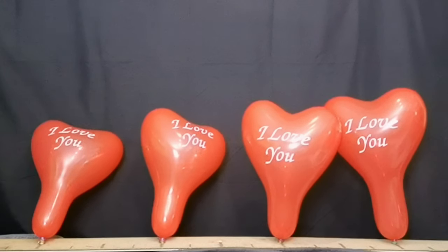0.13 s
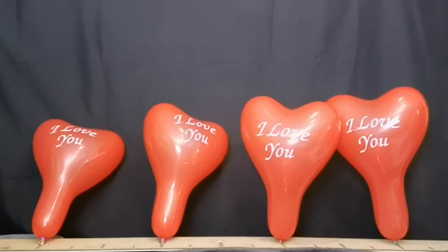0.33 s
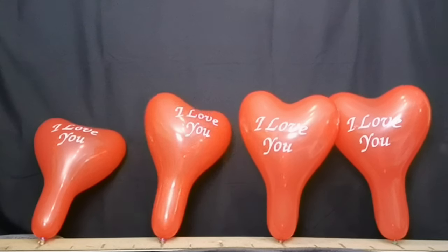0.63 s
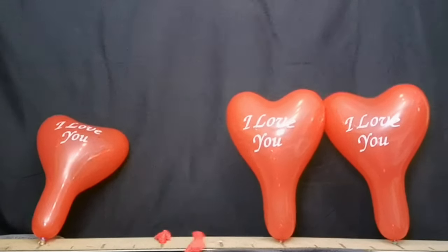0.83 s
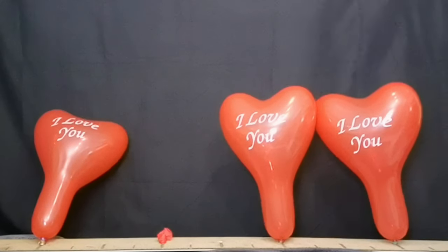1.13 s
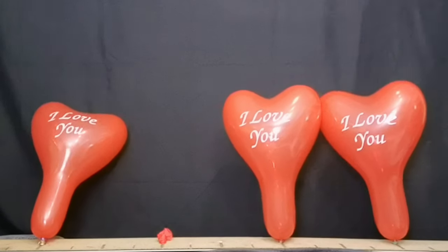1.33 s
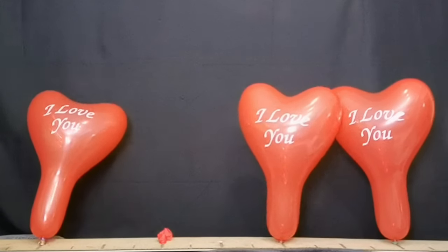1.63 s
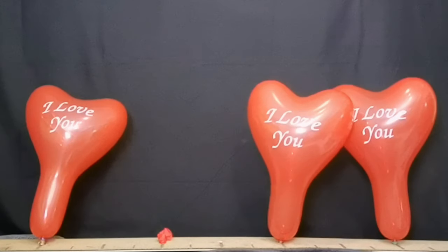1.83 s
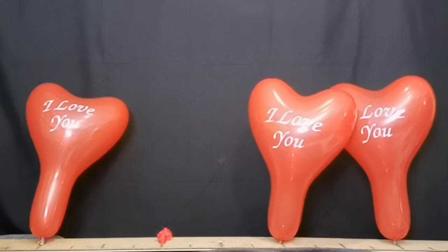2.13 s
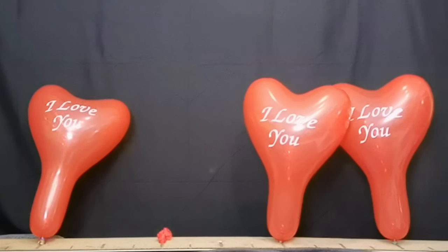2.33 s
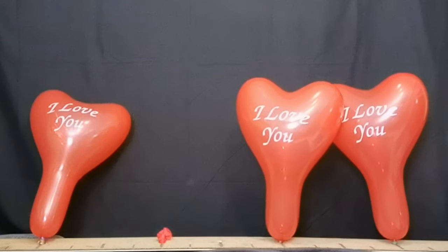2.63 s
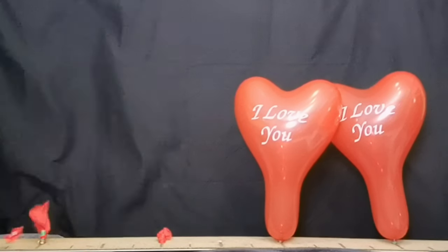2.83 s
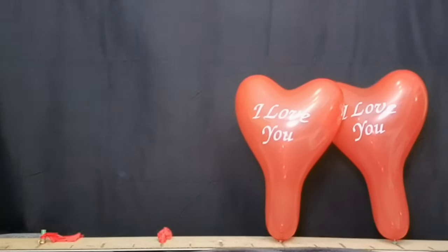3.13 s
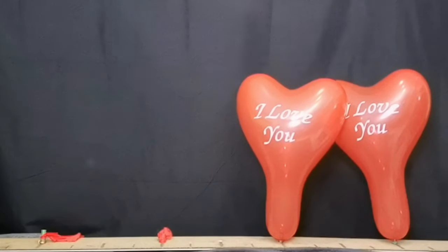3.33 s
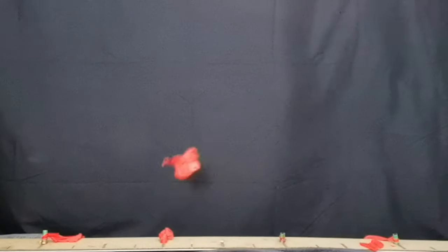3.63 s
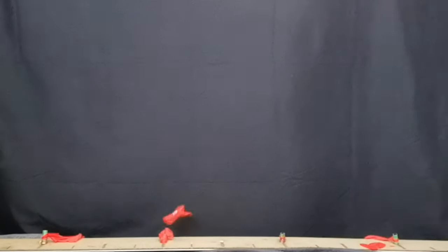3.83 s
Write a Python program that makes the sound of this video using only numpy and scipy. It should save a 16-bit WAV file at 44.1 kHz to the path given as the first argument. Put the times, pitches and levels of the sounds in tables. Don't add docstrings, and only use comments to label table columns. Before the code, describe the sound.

Close stereo pickup of a blower's steady mid-pitched whine and airy rush indoors, broken by an early sharp balloon pop, then two later bangs, each followed by short room boom and a quieter pump.

```python
import sys
import numpy as np
from scipy import signal
from scipy.fft import rfft, irfft
from scipy.io import wavfile
from scipy.ndimage import uniform_filter1d

SR = 44100
rng = np.random.default_rng(int(sys.argv[2]) if len(sys.argv) > 2 else 0)


def bounce(signal):
    frames = np.transpose(np.atleast_2d(signal))
    limited = np.clip(frames, -1, 1)
    pcm = np.round(limited * 32767).astype(np.int16)
    wavfile.write(sys.argv[1], SR, pcm)


def invert_db(x):
    u = np.asarray(x, float) / 20
    return 10 ** u


N = 176400


def at_hz(points, hz):
    table_hz, values = np.array(points).T
    return np.interp(np.log(np.maximum(hz, 1)), np.log(table_hz), values)


def drift(rate_hz):
    r = np.exp(-80 * np.pi * rate_hz / SR)
    slow = signal.lfilter([1], [1, -2 * r, r * r], rng.standard_normal(N // 40 + 2002))[2000:]
    return np.interp(np.arange(N) / 40, np.arange(len(slow)), slow / slow.std())


def tone(hz, level_db, pan_db, wobble_db, lag_rad):
    phase = 2 * np.pi * np.cumsum(hz) / SR + rng.uniform(0, 2 * np.pi)
    phase = phase + .05 * wobble_db * drift(12)
    lag_rad = lag_rad + .1 * wobble_db * drift(4)
    shared_db = np.minimum(wobble_db * drift(14), 4)
    left_db = level_db + pan_db / 2 + shared_db
    right_db = level_db - pan_db / 2 + shared_db + 0.99 * wobble_db * drift(1.4)
    return np.sqrt(2) * invert_db(np.array([left_db, right_db])) * np.sin([phase, phase - lag_rad])


# (frequency [Hz], correlation [0-1])
LIKENESS_AT_HZ = [(30, 0.84), (90, 1), (700, 1), (2500, 0.26), (4500, 0.39), (6200, 0.2), (8000, 0.1),
                  (15000, 0.072)]


def noise_bands(spectrum, peaks, pan, lag_s):
    ripple_db, ripple_hz = 2.5, 27.7
    hz = np.arange(N // 2 + 1) * SR / N
    colour_db = at_hz(spectrum, hz)
    for peak_hz, width_hz, lift_db in peaks:
        colour_db = colour_db + lift_db / (1 + (2 * (hz - peak_hz) / width_hz) ** 2)
    gain = invert_db(colour_db) / np.sqrt(np.mean(invert_db(colour_db) ** 2))

    shared, own = rfft(rng.standard_normal((2, N)))
    alike = np.clip(at_hz(LIKENESS_AT_HZ, hz), 0, 1)
    right = (alike * shared + np.sqrt(1 - alike ** 2) * own) * np.exp(-2j * np.pi * hz * lag_s)
    side = invert_db(at_hz(pan, hz) / 2)

    ripple_bins = int(ripple_hz * N / SR)
    ripple = uniform_filter1d(rng.standard_normal((2, len(hz))), ripple_bins)
    ripple = uniform_filter1d(ripple, ripple_bins)
    both = gain * invert_db(ripple_db * ripple / ripple.std()) * np.array([shared * side, right / side])

    place = 2 * np.log2(np.maximum(hz, 1) / 30)
    for k in range(19):
        yield 30 * 2 ** (k / 2), irfft(both * np.clip(1 - abs(place - k), 0, 1), N)


# (multiple of blade rate, level [dB rms], left minus right [dB], wobble [dB], right lag [rad])
BLADE_TONES = [(1, -15, 2, .8, .55), (2, -26.5, .2, 1.2, 1.5), (3, -33.5, 9, 1.5, 2.5),
               (4, -29, 0, 1.5, 3.1), (5, -43, -2, 2.5, 3.3), (7, -32, 3, .8, 3.9), (8, -41, 3, 2.5, 6.0),
               (9, -45, 6, 2.5, 6.8), (14, -49, 10, 2.5, 19.7)]
# (time [s], extra lag of 3rd tone [rad], of 7th tone [rad])
PATH_SHIFTS = [(0, 0, 0), (.8, 0, 0), (.95, .1, 1.6), (1.45, .1, 1.5), (1.65, 0, .4), (2.05, -.9, -.2),
               (2.3, -1.3, -.7), (2.7, -1.1, -.3), (3.3, -1.2, -1), (3.75, -.7, 1.6)]


def blade_whine():
    final_hz, settling_hz, settling_s = 718, 2.6, .8
    hum_hz, hum_depth = 100.1, .33
    t = np.arange(N) / SR
    blade_hz = final_hz - settling_hz * np.exp(-t / settling_s)
    throb = 1 + hum_depth * np.sin(2 * np.pi * hum_hz * t)
    shift_s, third_rad, seventh_rad = np.transpose(PATH_SHIFTS)
    shift_rad = {3: np.interp(t, shift_s, third_rad), 7: np.interp(t, shift_s, seventh_rad)}
    out = np.zeros((2, N))
    for k, level_db, pan_db, wobble_db, lag_rad in BLADE_TONES:
        partial = tone(k * blade_hz, level_db, pan_db, wobble_db, lag_rad + shift_rad.get(k, 0))
        out += partial * (throb if 3 <= k <= 5 else 1)
    return out


# (frequency [Hz], level [dB rms], left minus right [dB], wobble [dB], right lag [rad])
MOTOR_TONES = [(100.1, -34.5, -1, 1.2, 0), (1872.7, -38, 4, 2.5, 2.2), (2419.5, -41.5, -2, 2.5, 1.2),
               (4480, -45, 0, 3, 4.2), (1340, -52, 0, 3, 1.3)]


def motor_hum():
    return sum(tone(np.full(N, hz), *row) for hz, *row in MOTOR_TONES)


# (frequency [Hz], level [dB per Hz])
RUSH_SPECTRUM = [(30, -25), (110, -4), (500, -1.5), (1000, -6), (3000, -2), (8000, -6), (11500, -16.5),
                 (16000, -25.5)]
# (frequency [Hz], width [Hz], lift [dB])
HOUSING_PEAKS = [(185, 180, 2.5), (457.6, 65, 8.5), (621.6, 62, 12.5), (776, 65, 10.5), (2124, 81, 5),
                 (3780, 620, -4.5), (5240, 4100, 2), (7467, 80, 10.5), (10170, 370, 4)]
# (frequency [Hz], left minus right [dB])
PUMP_PAN_AT_HZ = [(200, 7), (500, -0.5), (1500, 3.5), (4400, -1), (8000, 8.5), (15000, 16)]


def air_rush():
    level_db, patchy_db, right_lag_s = -22, 1.72, 0.00016
    gust = drift(3)
    rush = np.zeros((2, N))
    for _, band in noise_bands(RUSH_SPECTRUM, HOUSING_PEAKS, PUMP_PAN_AT_HZ, right_lag_s):
        rush += band * invert_db(patchy_db * (0.21 * gust + drift(14.0)))
    return invert_db(level_db) * rush


# (time [s], level [dB], crack over level [dB], lead-in hiss level [dB], lead-in growth time [s])
BURST_EVENTS = [
    (0.8256, 11.5, 12, 3, .004),
    (2.9038, 12, -2.5, 6, 0.006),
    (3.55, 15.5, -18.5, 7, 0.009),
]
# (boom [Hz], width [octaves], lift [dB], treble tilt [dB per octave], ring time factor)
BALLOON_BOOMS = [
    (259, 1.6, -3, -0.6, 1.05),
    (220, 2, 2, 1.3, 1.054),
    (470, 0.39, 13.5, 3, 1.05),
]
BANG_BASS_DB = [-11, -3, 5]
# (frequency [Hz], level [dB per Hz])
BANG_SPECTRUM = [(30, -15), (100, 4), (250, 7.5), (700, -3.5), (1500, -2.5), (3000, -3.5), (6000, -8),
                 (11000, -20.5), (16000, -43)]
# (frequency [Hz], width [Hz], lift [dB])
MIC_PEAKS = [(3760, 2100, -4.5), (6500, 7300, 4.5)]
# (frequency [Hz], left minus right [dB])
BANG_PAN_AT_HZ = [(100, -1.5), (700, 2), (2400, 1.5), (4400, -0.5), (8000, 10), (15000, 19)]
# (frequency [Hz], t60 [s])
ROOM_T60 = [(30, 0.96), (80, 0.36), (250, 0.26), (1000, 0.24), (6000, 0.26), (15000, 0.23)]


def bursts():
    crack_s, build_s, rough_db, bass_hz = .0015, .0007, 2.0, 110
    direct_share, direct_s, right_lag_s = 0.54, 0.007, .00008
    t, out, echoes = np.arange(N) / SR, np.zeros((2, N)), drift(140)
    for hz, band in noise_bands(BANG_SPECTRUM, MIC_PEAKS, BANG_PAN_AT_HZ, right_lag_s):
        shape = np.zeros(N)
        for event, boom, bass_db in zip(BURST_EVENTS, BALLOON_BOOMS, BANG_BASS_DB):
            burst_s, level_db, _, swell_db, swell_s = event
            boom_hz, width_oct, lift_db, tilt_db, ring = boom
            after_s = np.maximum(t - burst_s, 0)
            colour_db = lift_db * np.exp(-(np.log2(hz / boom_hz) / width_oct) ** 2)
            colour_db += tilt_db * np.log2(max(hz, 600) / 1000)
            colour_db += bass_db / (1 + (hz / bass_hz) ** 2)
            decay_db = 60 * after_s / ring / at_hz(ROOM_T60, hz)
            build = 1 - np.exp(-after_s / build_s)
            direct = 1 + direct_share * np.exp(-after_s / direct_s) * hz / (hz + 500)
            shape += invert_db(level_db + colour_db - decay_db) * build * direct
            swell = np.exp(np.minimum(t - burst_s, 0) / swell_s) * (t < burst_s)
            shape += invert_db(swell_db) * swell * hz / (hz + 1500)
        out += band * shape * invert_db(rough_db * (echoes + 0.18 * drift(49)))
    for burst_s, level_db, crack_db, *_ in BURST_EVENTS:
        phase = (t - burst_s) / crack_s
        crack = np.sin(2 * np.pi * phase) * np.sin(np.pi * phase) * (abs(phase - .5) < .5)
        out += invert_db(level_db + crack_db) * crack
    return out


def nozzles():
    level_db, low_hz, high_hz, pan_db = -19.5, 7000, 10400, 15
    band = signal.butter(2, [low_hz, high_hz], "band", fs=SR, output="sos")
    freed = np.arange(N) / SR > BURST_EVENTS[-1][0]
    jet = signal.sosfilt(band, rng.standard_normal((2, N))) * freed
    return jet * invert_db(level_db + 1.5 * drift(9.8) + pan_db * np.array([[.5], [-.5]]))


def preamp_hiss():
    return invert_db(-48.5 + np.array([[3], [-3]])) * rng.standard_normal((2, N))


def scene():
    return blade_whine() + motor_hum() + air_rush() + bursts() + nozzles()


# (duck lead [s], depth [dB], hold [s], lasting loss [dB], extra left loss [dB])
LIMITER_DUCKS = [
    (0.0064, 21.5, 0.05, 6.5, -0.26),
    (0.005, 19.5, 0.036, 9, 2.5),
    (0.0015, 20.5, 0.022, 7.5, 4),
]


def limiter_db():
    release_s, regain_db_per_s = 0.086, 0.7355
    t, gain_db = np.arange(N) / SR, np.zeros((2, N))
    for (burst_s, *_), (ahead_s, depth_db, hold_s, loss_db, left_db) in zip(BURST_EVENTS, LIMITER_DUCKS):
        since_s = t - burst_s + ahead_s
        duck_db = (depth_db - loss_db) * np.clip(1 - (since_s - hold_s) / release_s, 0, 1)
        lasting_db = np.maximum(loss_db - regain_db_per_s * since_s, 0)
        side_db = left_db * np.array([[.5], [-.5]])
        gain_db -= (since_s > 0) * (duck_db + lasting_db + side_db)
    return uniform_filter1d(gain_db, size=60)


def link_treble(x):
    low_hz, high_hz, band_bins = 5150, 8300, 20
    linked_share, inverted_share = .6, .22
    hz, t, (left, right) = signal.stft(x, SR, nperseg=2048)
    chance, flip = rng.random((2, *left.shape))
    steady = np.all([abs(t - s - .05) > .1 for s, *_ in BURST_EVENTS], axis=0)
    for low in np.flatnonzero((hz > low_hz) & (hz < high_hz))[::band_bins]:
        band = slice(low, low + band_bins)
        sign = np.sign(np.sum(left[band] * right[band].conj(), axis=0).real)
        sign = sign * np.where(flip[low] < inverted_share, -1, 1)
        scale = np.linalg.norm(right[band], axis=0) / (np.linalg.norm(left[band], axis=0) + 1e-12)
        linked = steady & (chance[low] < linked_share)
        right[band] = np.where(linked, sign * scale * left[band], right[band])
    return signal.istft(np.array([left, right]), SR, nperseg=2048)[1][:, :N]


def roll_off(x):
    return signal.sosfilt(signal.butter(12, 15740, fs=SR, output="sos"), x)


def record(dry):
    x = 0.92 * np.tanh(dry * invert_db(limiter_db()) / 0.8)
    x = x + preamp_hiss()
    x = signal.sosfilt(signal.ellip(10, .5, 70, 15720, fs=SR, output="sos"), x)
    mix = link_treble(x)
    return roll_off(mix)


dry = scene()
out = record(dry)
bounce(out)
```